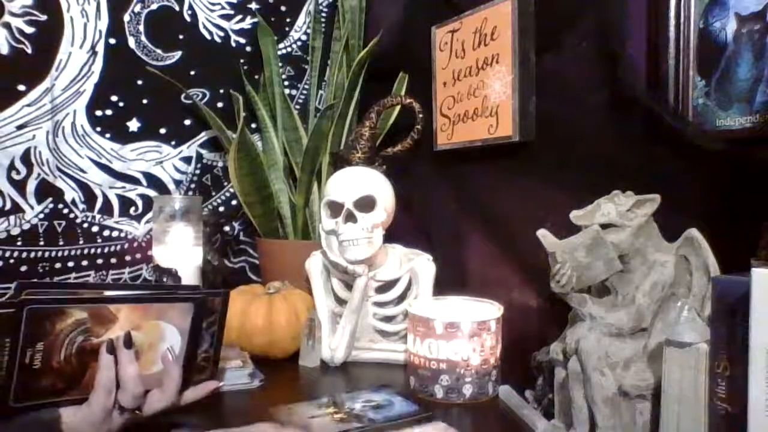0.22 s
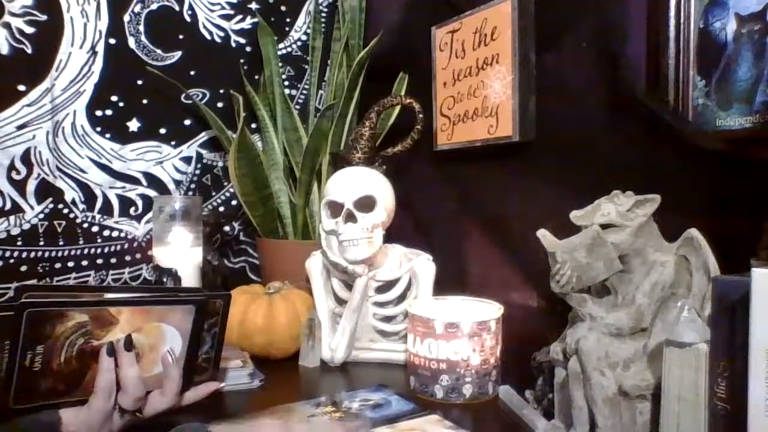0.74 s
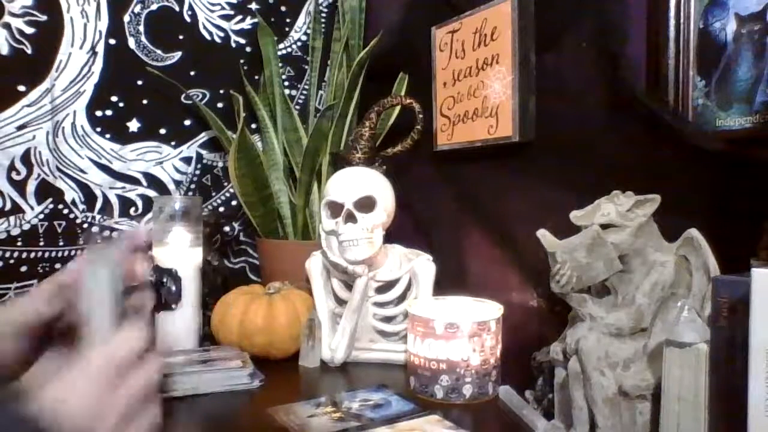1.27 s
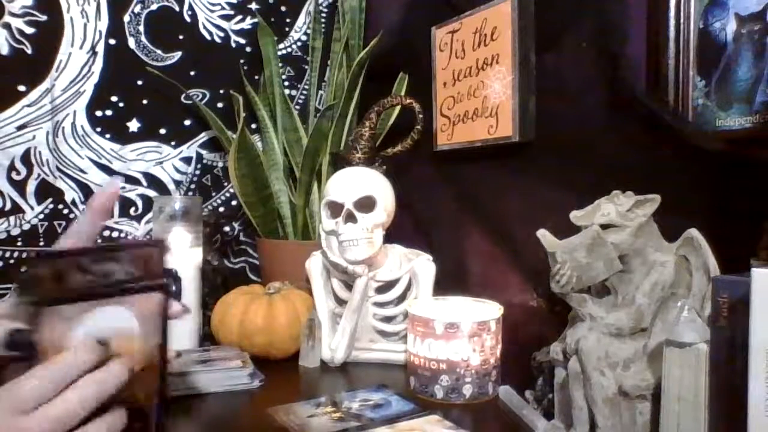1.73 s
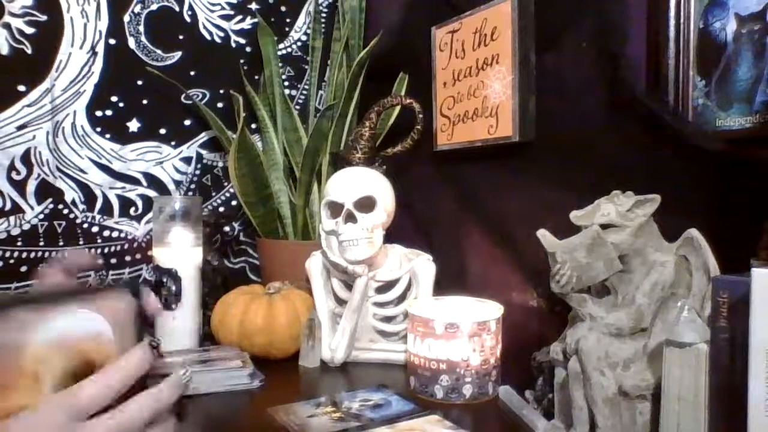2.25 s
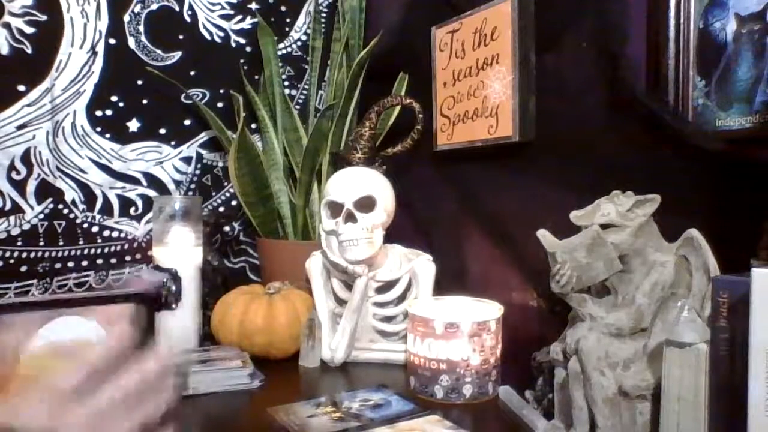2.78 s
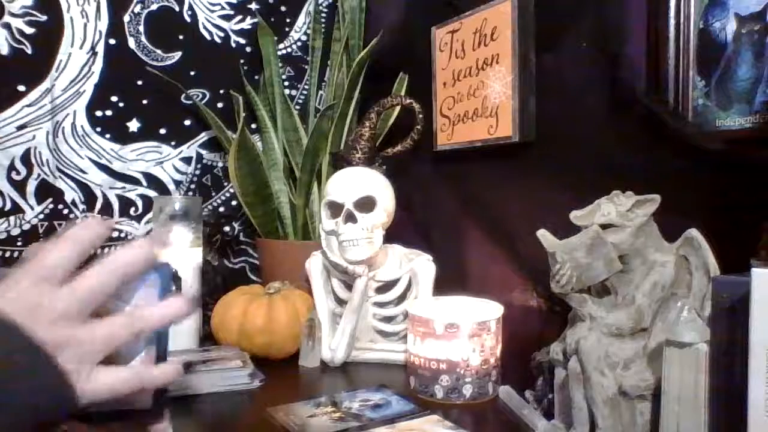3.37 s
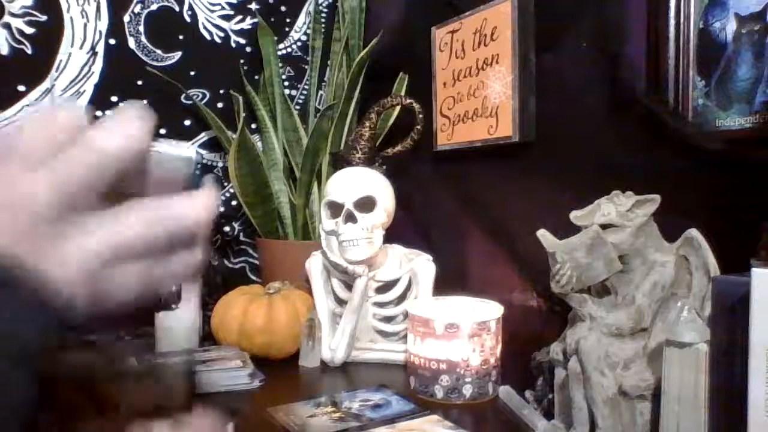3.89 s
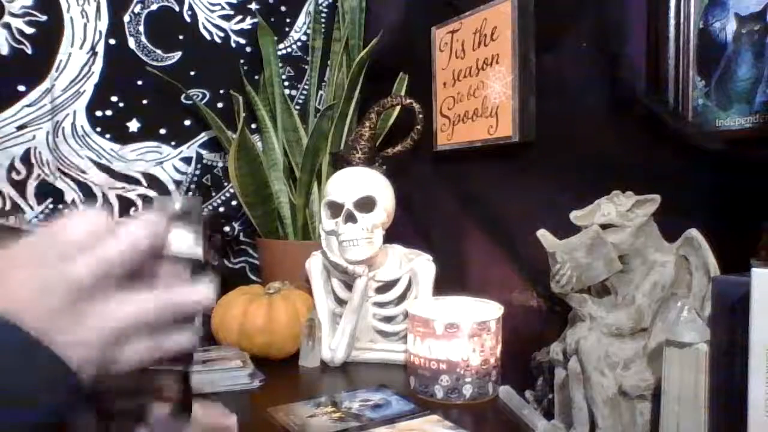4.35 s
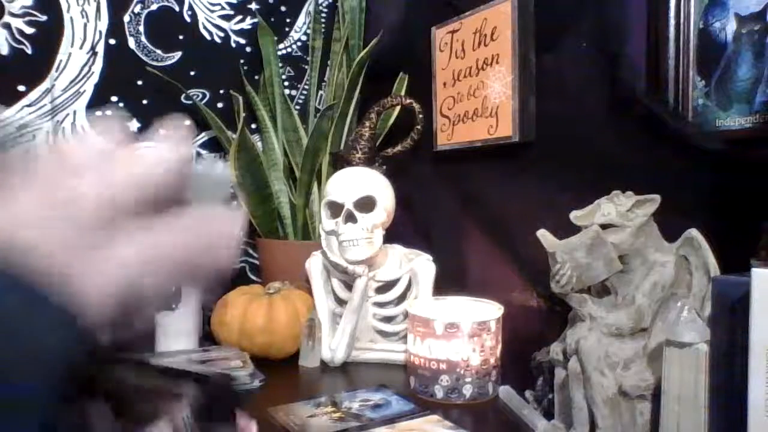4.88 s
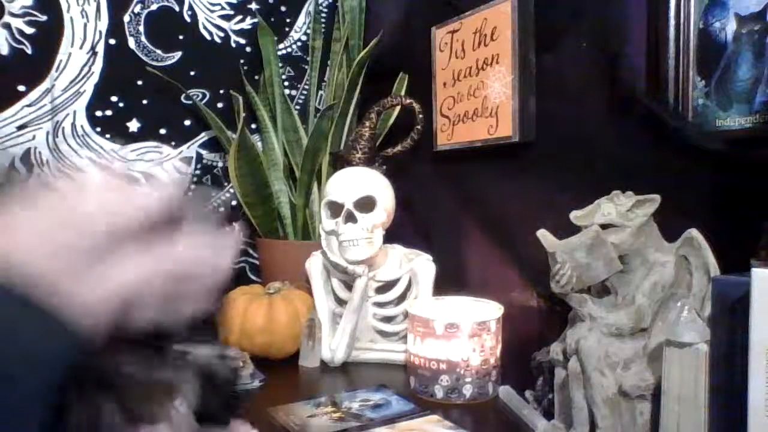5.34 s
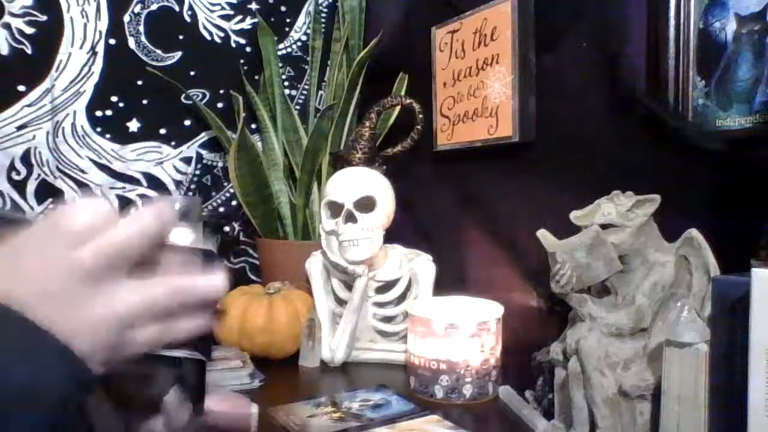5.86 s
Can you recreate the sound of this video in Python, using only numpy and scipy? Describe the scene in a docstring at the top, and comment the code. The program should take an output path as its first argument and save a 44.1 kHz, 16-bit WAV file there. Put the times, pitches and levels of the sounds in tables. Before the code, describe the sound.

A close microphone catches faint card rustle, soft slides, then an uneven clatter of deck taps and woody thuds with a tiny squeak. One distorted, far louder knock follows, rattling briefly. Only small finger sounds and the low fan hum remain until much quieter shuffling starts: fine ticks, papery swishes and soft packet slaps, in a small dry indoor space.

```python
"""Hands square a deck of stiff cards on a wooden table, knock it down hard once, then shuffle it overhand:
each packet ticks off the thumb, slides with a hiss and slaps home. Contacts are noise bursts with a spike
exciting damped resonances; slides are coloured noise roughened by catching fibres. A fan hums, as tones and
air noise, in a small dry room; one close microphone is overloaded by the hardest knock."""
import sys
import numpy as np
from scipy import signal
from scipy.fft import rfft, irfft, next_fast_len
from scipy.io import wavfile
from scipy.ndimage import uniform_filter1d, map_coordinates

SR = 44100
rng = np.random.default_rng(int(sys.argv[2]) if len(sys.argv) > 2 else 0)


def elevation(decibels):
    """Turn decibel levels (scalar or array-like) into linear amplitude ratios."""
    levels = np.asarray(decibels, float)
    return 10 ** (levels / 20)


def store_wav(level_fs):
    """Save 16-bit WAV to argv[1]."""
    pcm = np.round(np.clip(np.atleast_2d(level_fs), -1, 1) * 32767)
    wavfile.write(sys.argv[1], SR, pcm.T.astype(np.int16))


N = 269892  # samples, 6.12 s

# the deck's edge tapped on the table, with one hard knock and its rattle from 2.4166 s:
# time_s, slap_peak_db, slap_centre_hz, crack_relative_db
TAPS = [(1.358, -12, 1170, -40), (1.385, -16, 1337, -14), (1.627, -14.5, 1290, -22),
        (1.636, -9.5, 1390, -37), (1.645, -10.5, 1320, -32), (1.656, -13.5, 1400, -28),
        (1.67, -12, 1480, -11), (1.728, -26, 1280, -34), (1.75, -31, 910, -28), (1.835, -25.5, 1280, -45),
        (1.877, -20.5, 1570, -34), (1.894, -14, 1420, -36), (1.957, -11.5, 1420, 0.5),
        (1.984, -9, 1460, -11), (1.997, -6, 1672, -5.5), (2.004, -18, 1570, 6), (2.058, -28, 1074, -38),
        (2.178, -34, 1330, -24), (2.4166, 4.5, 1016, -3), (2.423, 11.5, 2090, -3.5), (2.432, 5, 1150, -3),
        (2.441, -2, 1880, -12.5), (2.453, -8.5, 1737, -8), (2.463, -7.5, 1610, -2), (2.472, -11, 1390, 1.5),
        (2.854, -43, 1002, -14)]
# cards ticking and slapping in the hands: time_s, slap_peak_db, snap_relative_db, crack_relative_db
TICKS = [(0.063, -46.5, 3, -27), (1.56, -35, -4, -19), (1.584, -18, -14.5, -21), (2.928, -52.5, 2.5, -20),
         (3.022, -52.5, 2.5, -19.5), (3.186, -47, 0.5, 2), (3.246, -48, -6, -5), (3.633, -44, -4.5, -19),
         (3.76, -32.5, -4, -2), (3.818, -29, 0.5, 2.5), (3.958, -17.5, -14, -8), (3.966, -17, -6, -3),
         (3.978, -12.5, -9, -2.5), (3.986, -23, -21, -7), (4.021, -26, 0, -4), (4.047, -13, -8, -18),
         (4.354, -39.5, -4.5, -2), (4.381, -39.5, -3, -2), (4.414, -40, 0, 2), (4.432, -28, 8, -7),
         (4.46, -29.5, -8, -6), (4.467, -30.5, 1.5, -1), (4.506, -28, 0.5, -7), (4.516, -29.5, -4.5, -6),
         (4.559, -38.5, -2, -12), (4.588, -41.5, 0, -16), (4.649, -40, 0, -6), (4.67, -30.5, 4.5, -3),
         (4.717, -40.5, -4, -7), (4.765, -38, -7, -9), (4.785, -29.5, -8, -6), (4.834, -26, -3, -6),
         (4.844, -26.5, 5.5, 1.5), (4.981, -42.5, -1.5, -13), (5.025, -36, -6, -5), (5.08, -33, -7, -10),
         (5.127, -27.5, 4.5, -7), (5.154, -26.5, 3.5, -6), (5.277, -43, -3, -3.5), (5.322, -41, 2.5, -10),
         (5.331, -44, 1, -9), (5.377, -24.5, -4, -3), (5.421, -22.5, -2.5, 0), (5.441, -22.5, -5.5, -14.5),
         (5.593, -40.5, -1.5, -11.5), (5.621, -45, 1, -17), (5.682, -26, -1, -2), (5.72, -21.5, -8, 3),
         (5.74, -20, -9, -13), (5.886, -31.5, -0.5, -3), (5.928, -37, -0.5, -19.5), (5.979, -27.5, 2, -8),
         (6.022, -21.5, -5, 2.5), (6.042, -23, -3, -14)]
# upper flexing of a card: centre_hz, width_hz, gain_db
CARD_MODES = [(2800, 1000, 1), (4440, 1800, -1.5)]
# deck and fingers striking the table: time_s, peak_db, contact_s
THUDS = [(0.057, -34, 0.0033), (1.359, -13.5, 0.0006), (1.466, -17, 0.0031), (1.587, -24, 0.0025),
         (1.635, -15, 0.0018), (1.648, -12.5, 0.00051), (1.676, -16.5, 0.00086), (1.729, -22.5, 0.00072),
         (1.754, -23.5, 0.0024), (1.836, -16.5, 0.0034), (1.878, -12, 0.0037), (1.898, -14, 0.0024),
         (1.958, -23, 0.0033), (1.998, -16, 0.00095), (2.06, -21.5, 0.0026), (2.089, -24.5, 0.0061),
         (2.121, -29, 0.006), (2.418, -1.5, 0.0023), (2.427, 8, .0026), (2.44, -1, .002),
         (2.461, -15.5, 0.003), (2.479, -18, 0.0065), (2.63, -28.5, 0.0032), (2.781, -29, 0.0011),
         (2.798, -29, 0.0029), (2.851, -26, 0.0015)]
# resonances of the table top: centre_hz, width_hz, gain_db
TABLE_MODES = [(54, 14, -13), (86, 17, -2), (137, 30, 2), (251, 30, -8.5), (288, 45, -3.5),
               (371.3, 31, 2.5), (507, 28, -4.5), (650, 210, -8.5)]
# packets closing on the deck in the hand: time_s, puff_peak_db, knock_peak_db
CLAPS = [(3.819, -29.5, -28), (3.957, -56, -23), (3.968, -25.5, -20), (4.043, -24, -21.5),
         (4.429, -30, -33), (4.51, -33, -35.5), (4.785, -45, -31.5), (5.13, -29, -26), (5.377, -40, -20.5),
         (5.419, -19, -18), (5.683, -39, -23.5), (5.718, -20.5, -20), (5.98, -40, -27.5),
         (6.018, -19, -27.5)]
# resonances of the deck held in the hand: centre_hz, width_hz, gain_db
DECK_MODES = [(204, 90, 5), (400, 94, 9.5), (576, 75, -1), (1150, 400, -18)]
# cards sliding on cards or table: start_s, full_speed_s, stop_s, hiss_db, scrape_relative_db
SLIDES = [(1.01, 1.104, 1.105, -53, 5), (1.127, 1.23, 1.245, -54, -4), (1.287, 1.3, 1.35, -50.5, -7),
          (1.343, 1.43, 1.47, -48, -10), (1.47, 1.53, 1.53, -50, 0), (1.568, 1.586, 1.606, -38, 3),
          (1.619, 1.636, 1.664, -52.5, 26), (1.875, 1.905, 1.92, -46.5, 4),
          (1.956, 1.958, 1.968, -42.5, 12), (1.97, 1.99, 2.063, -52, 15.5), (2.235, 2.26, 2.265, -62, 4),
          (3.0, 3.03, 3.06, -62, -9), (3.18, 3.19, 3.25, -61.5, -9), (3.485, 3.501, 3.55, -52, -0.5),
          (3.52, 3.53, 3.56, -61, -8), (3.74, 3.766, 3.78, -47.5, 2.5), (3.768, 3.818, 3.805, -35.5, -3.5),
          (3.85, 3.866, 3.82, -60, -17), (3.964, 3.974, 3.99, -33.5, 0.5), (4.017, 4.02, 4.04, -37.5, -1.5),
          (4.05, 4.055, 4.09, -49.5, 2), (4.16, 4.225, 4.26, -53, -5.5), (4.345, 4.357, 4.362, -49, -1),
          (4.406, 4.432, 4.45, -35.5, -5.5), (4.424, 4.515, 4.517, -33, -5), (4.537, 4.535, 4.55, -54, 0),
          (4.555, 4.56, 4.572, -48, -4.5), (4.58, 4.588, 4.597, -51, -6), (4.645, 4.65, 4.665, -55, -8),
          (4.667, 4.671, 4.682, -45, -7), (4.69, 4.7, 4.735, -57, -2), (4.74, 4.771, 4.78, -49, -3),
          (4.782, 4.784, 4.83, -36, -5.5), (4.975, 4.981, 4.995, -52, -5), (5.0, 5.025, 5.04, -55, -4),
          (5.058, 5.082, 5.11, -42, -6), (5.07, 5.116, 5.157, -33, -5.5), (5.272, 5.284, 5.295, -49, -6),
          (5.3, 5.325, 5.37, -56, -5), (5.372, 5.377, 5.425, -34.5, -4.5), (5.585, 5.59, 5.6, -56, 0.5),
          (5.64, 5.672, 5.77, -50, -7), (5.678, 5.683, 5.72, -35.5, -4.5), (5.88, 5.886, 5.972, -54, -3),
          (5.976, 5.98, 6.045, -39, -0.5), (6.045, 6.05, 6.065, -50, 1)]
# sleeves and fingers moving: time_s, hiss_db, scrape_relative_db
RUSTLE = [(0, -57.5, 4), (.06, -63.5, -4), (.14, -50.5, -6.5), (.24, -51.5, -5), (.32, -56.5, -4),
          (.47, -78, 15), (.81, -73, 8), (.86, -61.5, -2), (1.0, -62.5, 3), (1.6, -61.5, 7),
          (1.72, -70.5, 12), (2.3, -74, 10), (2.56, -88, 29.5), (2.65, -60.5, 3), (2.75, -58.5, -4.5),
          (2.81, -68.5, 7.5), (3.45, -68, 3), (3.6, -64, -1), (4.7, -66, 1.5), (6.12, -66, 0)]
# colour of the fine rubbing: frequency_hz, relative_density_db
HISS_COLOUR = [(1760, -27.5), (3000, -0.5), (6620, 1), (9200, -1.5), (10100, 0), (15100, 3), (16000, -6)]
# colour of the coarse rubbing: frequency_hz, relative_density_db
SCRAPE_COLOUR = [(300, 10.5), (700, 5.5), (1500, 3), (3000, 5), (5000, -11.5), (9000, -37)]
# rubs with a colour of their own: start_s, end_s, centre_hz, width_hz, level_db
RUBS = [(1.07, 1.117, 4000, 2500, -51), (1.197, 1.242, 5840, 890, -52), (1.28, 1.348, 4040, 2030, -52.5),
        (1.366, 1.421, 1420, 503, -33.5), (1.47, 1.56, 3960, 1500, -67), (1.581, 1.642, 1350, 400, -29.5),
        (2.745, 2.797, 1500, 2000, -49), (3.66, 3.735, 4200, 2010, -55.5), (4.026, 4.039, 1500, 502, -36),
        (5.428, 5.442, 1070, 700, -26.5), (5.728, 5.746, 1080, 700, -25.5), (6.033, 6.043, 1110, 400, -29)]
# a card face squeaks: time_s, pitch_hz, level_db
SQUEAK = [(1.917, 2500, -48), (1.927, 2630, -39.5), (1.936, 2950, -35), (1.946, 3090, -50),
          (1.955, 3100, -53)]
# steady tones of the fan: pitch_hz, level_db
FAN_TONES = [(93.3, -45.5), (186.6, -49.5), (280, -50)]
# wavering narrow bands of the fan: centre_hz, width_hz, level_db
FAN_BANDS = [(57, 9.2, -49), (904.3, 30, -60.5)]
# colour of fan and room noise: frequency_hz, relative_density_db
AIR_COLOUR = [(15, -28), (25, -0.5), (75, -7), (130, -9.5), (234, -2.5), (330, -12.5), (390, -12),
              (472, -23), (660, -19), (1090, -24.5), (2140, -34), (3250, -41), (9400, -47), (15000, -43.5)]
# reverberation time of the room: frequency_hz, t60_s
ROOM_T60 = [(100, 0.21), (1000, 0.18), (4000, 0.14), (12000, 0.13)]


def unit(x):
    """Normalization: scaled to rms 1."""
    return x / np.sqrt(np.mean(x ** 2) + 1e-20)


def peak(x):
    """Normalization: scaled to peak 1."""
    return x / np.abs(x).max()


def along(points, hz):
    """Interpolation: (frequency, value) points read on a logarithmic frequency axis."""
    f, v = np.transpose(points)
    return np.interp(np.log(hz + 1), np.log(f + 1), v)


def wobble(rate):
    """Slow random modulation: a smooth curve through rate random knots a second."""
    knots = rng.standard_normal(int(N * rate / SR) + 4)
    return map_coordinates(knots, [np.arange(N) * rate / SR])


def filtered(x, response):
    """Linear filtering: the spectrum of x times a complex response of frequency."""
    m = next_fast_len(len(x) + 8192)
    return irfft(rfft(x, m) * response(np.fft.rfftfreq(m, 1 / SR)), m)[:len(x)]


def resonance(f, hz, width):
    """Damped oscillator: one causal resonance with gain 1 at its centre."""
    return 1j * f * width / (hz * hz - f * f + 1j * f * width)


def modes(table):
    """Modal superposition: the summed resonances of a body, alternating in sign."""
    return lambda f: sum((-1) ** k * elevation(db) * resonance(f, hz, width)
                         for k, (hz, width, db) in enumerate(table))


def noise(spectrum):
    """Spectral shaping: noise of rms 1 with the given colour."""
    return unit(filtered(rng.standard_normal(N), lambda f: elevation(along(spectrum, f))))


def narrow_noise(hz, width):
    """Resonant selection: noise of rms 1 passed twice through one resonance."""
    return unit(filtered(rng.standard_normal(N), lambda f: resonance(f, hz, width) ** 2))


def patchy(x, depth_db):
    """Random gain modulation: soft patches in time and frequency, scaled to rms 1."""
    z = signal.stft(x, nperseg=256)[2]
    field = uniform_filter1d(rng.standard_normal(z.shape), size=10, axis=0)
    field = uniform_filter1d(field, size=8, axis=1)
    return unit(signal.istft(z * elevation(depth_db * unit(field)), nperseg=256)[1][:N])


def contacts():
    """Impact excitation: each contact rings a slap and a crack in the flexing cards and snaps the edges."""
    tap_snap_db, tap_t60_s = -31.5, .024
    tick_hz, tick_spread, tick_t60_s = 1300, .08, .017  # the spread scatters slap pitch from card to card
    crest_db = 9  # a snap's peak stands this far over its tabled level, a crack's half as far
    out, t = np.zeros(N + SR), np.arange(4096) / SR
    tick_pitch = tick_hz * np.exp(tick_spread * rng.standard_normal(len(TICKS)))
    rows = [(s, db, tap_snap_db, hz, tap_t60_s, crack_db) for s, db, hz, crack_db in TAPS]
    rows += [(s, db, snap_db, hz, tick_t60_s, crack_db)
             for (s, db, snap_db, crack_db), hz in zip(TICKS, tick_pitch)]
    for s, db, snap_db, hz, t60, crack_db in rows:
        at, burst = round(s * SR), rng.standard_normal((3, len(t)))
        burst[:, 30] += 3.5  # a brief lead-in, then full contact as one sharp spike
        burst *= 1 - np.exp(-(t / 0.00059) ** 2)
        fade = elevation(-60 * t / t60)
        flex = lambda f: resonance(f, hz, 0.39 * hz) * resonance(f, hz, 1.1 * hz)
        slap = filtered(burst[0] * fade, flex)
        dull = lambda f: 1 / (1 + 1j * f / 5500) ** 3  # the body of the deck carries little treble
        crack = filtered(burst[2] * fade ** 0.89, lambda f: modes(CARD_MODES)(f) * dull(f))
        edge_fade = elevation(-60 * t / 0.0019) + 0.36 * elevation(-60 * t / .018)
        bright = lambda f: resonance(f, 5800, 16000) * resonance(f, 7000, 14000)
        snap = filtered(burst[1] * edge_fade, bright)
        contact = peak(slap)
        contact += elevation(crack_db + crest_db / 2) * peak(crack)
        contact += elevation(snap_db + crest_db) * peak(snap)
        out[at:at + len(t)] += elevation(db) * contact
    return out[:N]


def thuds():
    """Forced modes: a slightly rough half-sine push rings the table; long contact leaves the deep modes."""
    out, t = np.zeros(N + SR), np.arange(16384) / SR
    for s, db, contact_s in THUDS:
        push = np.sin(np.pi * np.clip(t / contact_s, 0, 1))
        rough = .5 * rng.standard_normal(len(t)) * elevation(-60 * t / 0.086)
        ring = filtered(push + rough, modes(TABLE_MODES))
        out[round(s * SR):][:len(t)] += elevation(db) * peak(ring)
    return out[:N]


def claps():
    """Air displacement: air squeezed from between packets pushes and pulls once; the deck knocks hollowly."""
    out, t = np.zeros(N + SR), np.arange(4096) / SR
    u = t / 0.00222  # time constant of the squeezed air, in s
    puff = u * (2 - u) * np.exp(-u)
    for s, puff_db, knock_db in CLAPS:
        knock = filtered(rng.standard_normal(len(t)) * elevation(-60 * t / 0.047), modes(DECK_MODES))
        out[round(s * SR):][:len(t)] += elevation(puff_db) * peak(puff) + elevation(knock_db) * peak(knock)
    return out[:N]


def slides_and_rustle():
    """Sliding friction: coated faces hiss; fibres catch in tiny bursts that roughen hiss and scrape together."""
    swell_db, stop_db_per_s = 20.5, 856  # rise from start to full speed; rate of dying after the stop
    slips_per_s, slip_db, slip_s = 70, 2.5, .002  # rate, mean jump and time constant of edges jerking free
    t = np.arange(N) / SR
    hiss_power, scrape_power = np.zeros(N), np.zeros(N)
    for start, full, stop, db, relative_db in SLIDES:
        swell = swell_db * np.clip((full - t) / max(full - start, .001), 0, None)
        dying = stop_db_per_s * np.clip(t - stop, 0, None)
        power = elevation(2 * (db - swell - dying))
        hiss_power += power
        scrape_power += power * elevation(2 * relative_db)
    slips = (rng.random(N) < slips_per_s / SR) * rng.exponential(slip_db, N)
    jerks = elevation(2 * signal.fftconvolve(slips, np.exp(-t[:1024] / slip_s))[:N])  # single edges let go
    s, hiss_db, relative_db = np.transpose(RUSTLE)
    hiss_power = hiss_power * jerks + elevation(2 * np.interp(t, s, hiss_db))
    scrape_power = scrape_power * jerks + elevation(2 * np.interp(t, s, hiss_db + relative_db))
    catch_db = wobble(90) * 1.8 + wobble(400) * 1.2
    hiss = np.sqrt(hiss_power) * elevation(catch_db) * patchy(noise(HISS_COLOUR), depth_db=2.0)
    scrape = np.sqrt(scrape_power) * elevation(catch_db + 1.7 * wobble(60)) * noise(SCRAPE_COLOUR)
    return hiss + scrape


def rubs():
    """Band-limited friction: short strokes of finger or card excite one band, swelling and fading."""
    out, t = np.zeros(N), np.arange(N) / SR
    for start, end, hz, width, db in RUBS:
        stroke = np.sin(np.pi * np.clip((t - start) / (end - start), 0, 1)) ** 1.1
        out += elevation(db) * narrow_noise(hz, width) * stroke
    return out


def squeak():
    """Stick-slip oscillation: a brief rising tone, unsteady in pitch and level."""
    s, hz, db = np.transpose(SQUEAK)
    t = np.arange(N) / SR
    pitch = np.interp(t, s, hz) * (1 + .015 * wobble(300))
    level = np.interp(t, s, db, -120, -120) + 2.5 * wobble(200)  # all but silent outside the table
    return elevation(level) * np.sqrt(2) * np.sin(2 * np.pi * np.cumsum(pitch) / SR)


def fan():
    """Rotating-blade noise: blade tones and narrow wavering bands over broad air noise."""
    t, out = np.arange(N) / SR, np.zeros(N)
    for k, (hz, db) in enumerate(FAN_TONES, 1):
        level = elevation(db + 0.85 * wobble(6.1))
        out += level * np.sqrt(2) * np.sin(2 * np.pi * hz * t + 0.34 * k * wobble(4))
    for hz, width, db in FAN_BANDS:
        out += elevation(db) * narrow_noise(hz, width)
    air_db = -40.5 + 0.88 * wobble(3)
    return out + elevation(air_db) * noise(AIR_COLOUR)


def room(x):
    """Reverberation: each frequency dies at its own speed, with a new random tail for every 0.1 s."""
    wet, size = np.zeros(N + SR), 4410
    delay = 200  # samples before the walls answer
    for at in range(0, N, size):
        hz, t, z = signal.stft(rng.standard_normal(SR // 4), SR, nperseg=256)
        decay = elevation(-60 * t / along(ROOM_T60, hz)[:, None])
        tail = signal.istft(z * decay, SR, nperseg=256)[1]
        echo = signal.fftconvolve(x[at:at + size], tail / np.linalg.norm(tail))
        wet[at + delay:at + delay + len(echo)] += echo
    return wet[:N]


def scene():
    """Superposition: cards near the microphone, their room sound and the fan, alike in both channels."""
    cards = contacts() + thuds() + claps() + slides_and_rustle() + rubs() + squeak()
    mono = cards + elevation(-15.5) * room(cards) + fan()
    return np.array([mono, mono])


def top_cut(x):
    """Nothing passes above the cut-off."""
    return signal.sosfilt(signal.butter(12, 17060, fs=SR, output="sos"), x)


def record(dry):
    """Saturation: the input stage clips near full scale; the treble from 15750 Hz up is cut by 22 dB."""
    clipped = dry / (1 + np.abs(dry / .99) ** 12) ** (1 / 12)
    treble_cut = lambda f: np.where(f < 15750, 1, elevation(-22))
    mix = np.array([filtered(channel, treble_cut) for channel in clipped])
    return top_cut(np.clip(mix, -1, 1))


dry = scene()
out = record(dry)
store_wav(out)
```